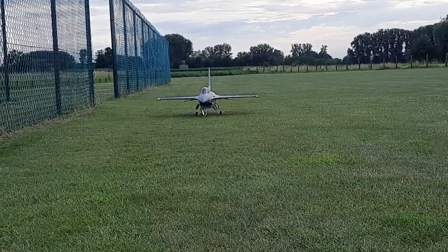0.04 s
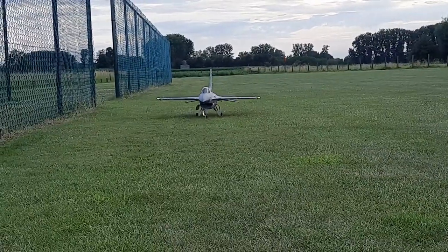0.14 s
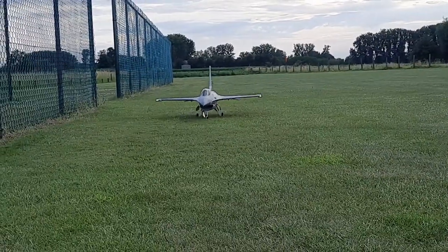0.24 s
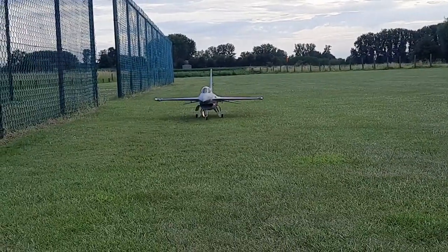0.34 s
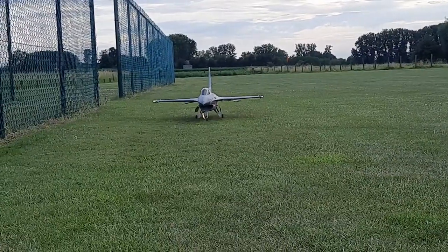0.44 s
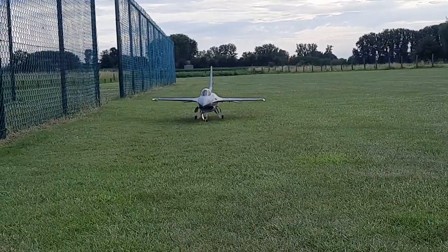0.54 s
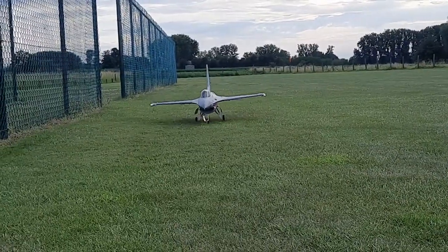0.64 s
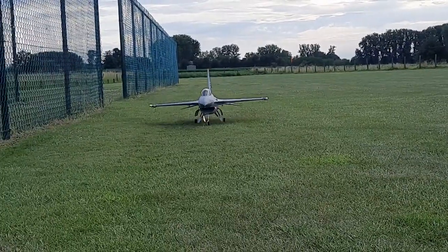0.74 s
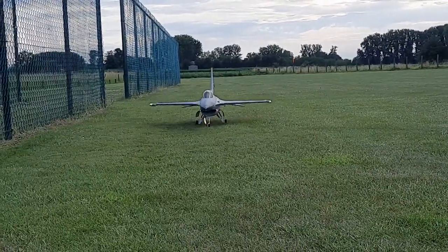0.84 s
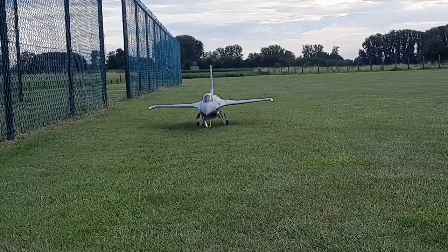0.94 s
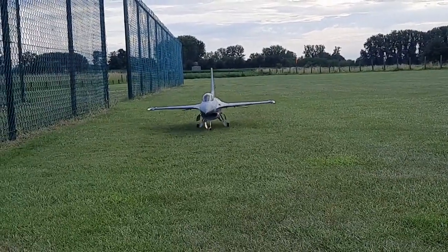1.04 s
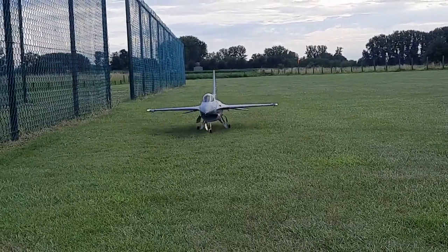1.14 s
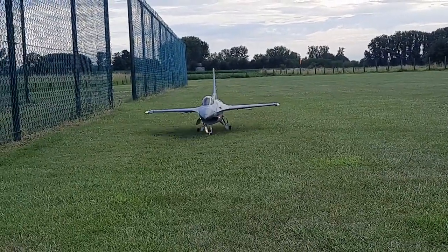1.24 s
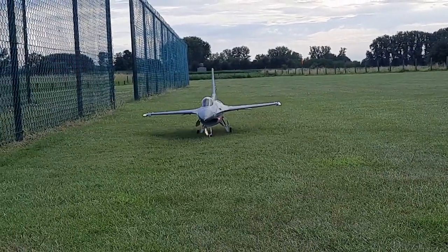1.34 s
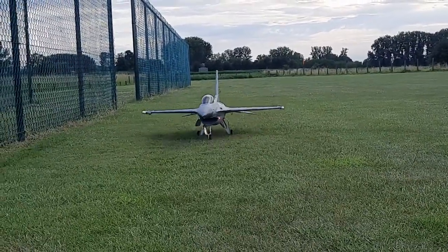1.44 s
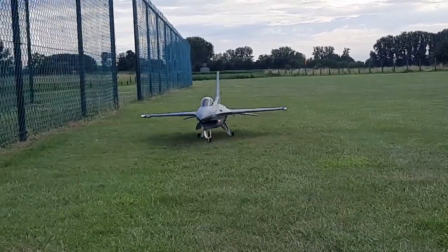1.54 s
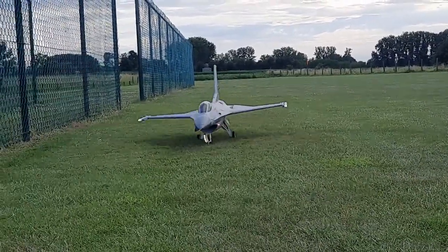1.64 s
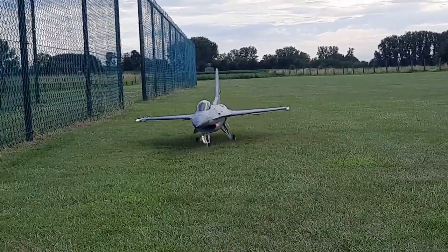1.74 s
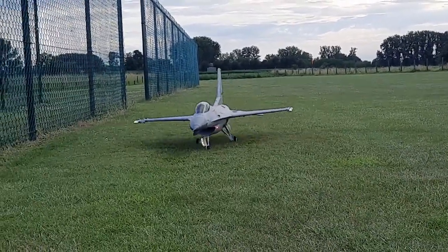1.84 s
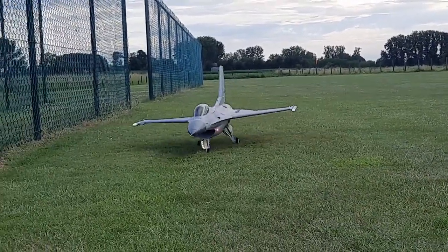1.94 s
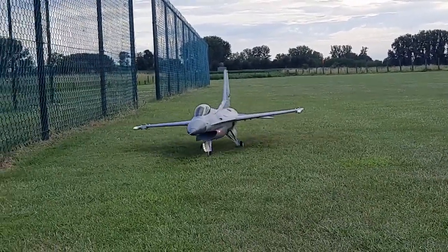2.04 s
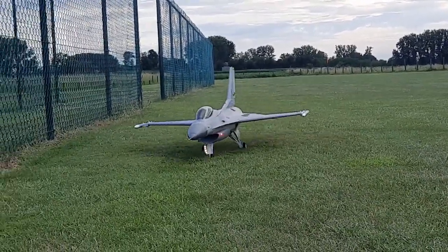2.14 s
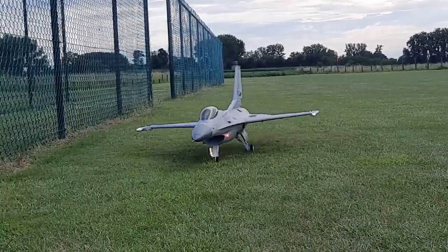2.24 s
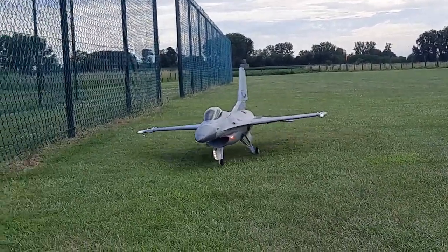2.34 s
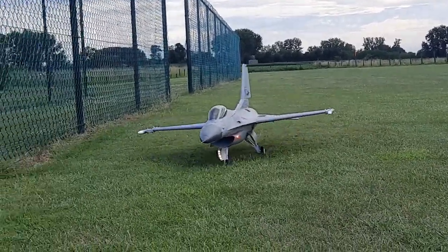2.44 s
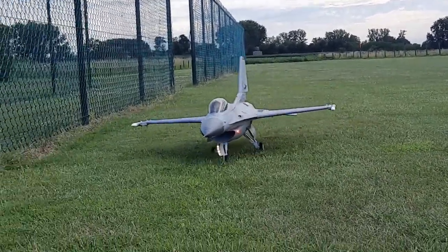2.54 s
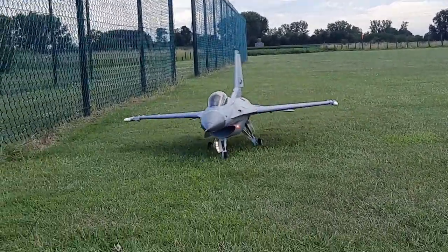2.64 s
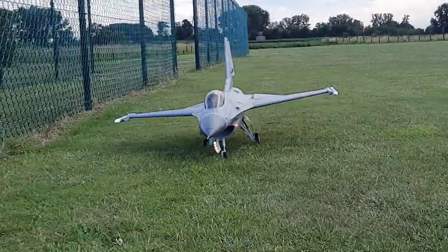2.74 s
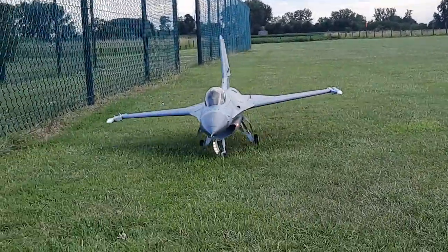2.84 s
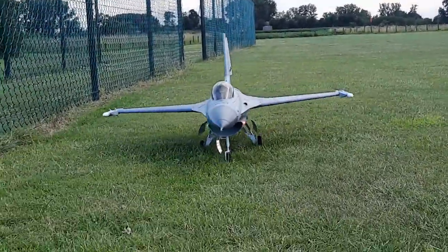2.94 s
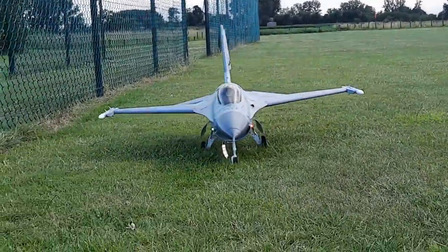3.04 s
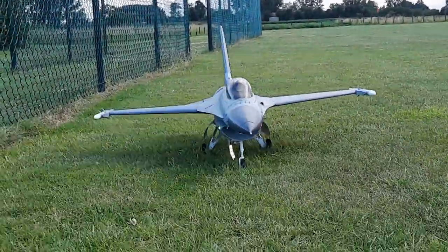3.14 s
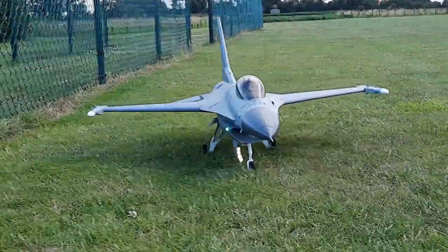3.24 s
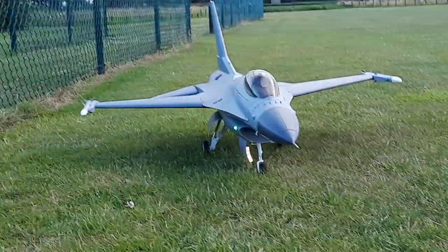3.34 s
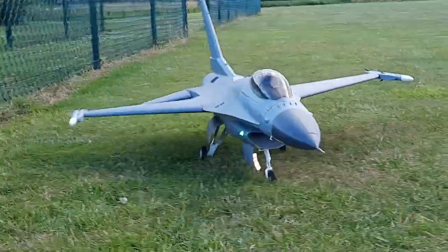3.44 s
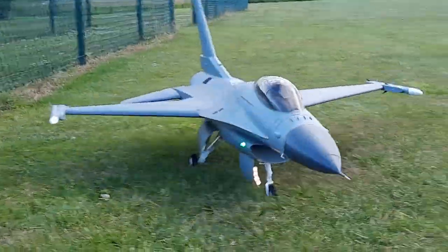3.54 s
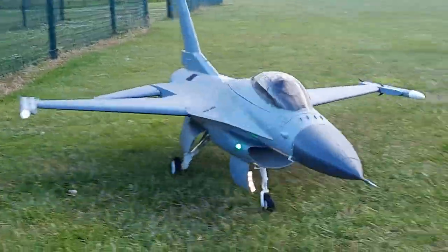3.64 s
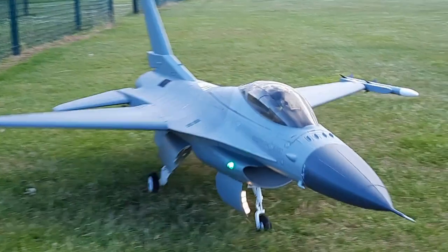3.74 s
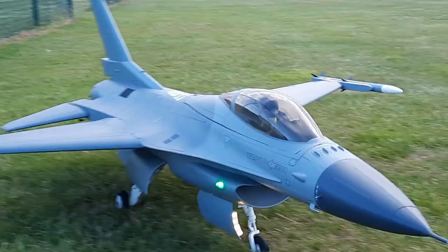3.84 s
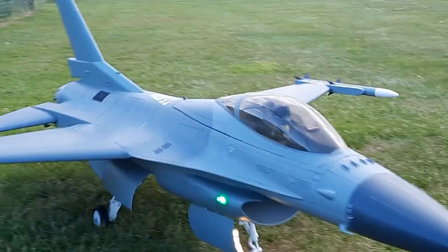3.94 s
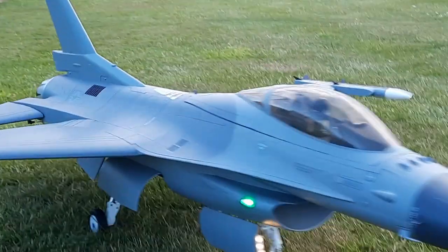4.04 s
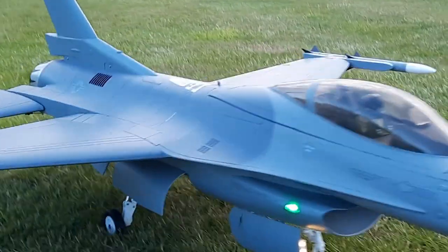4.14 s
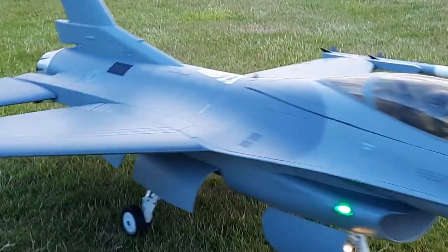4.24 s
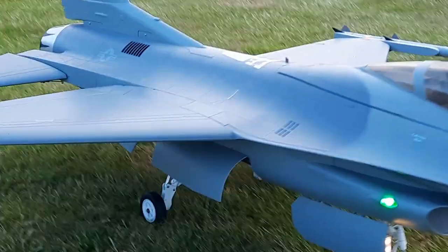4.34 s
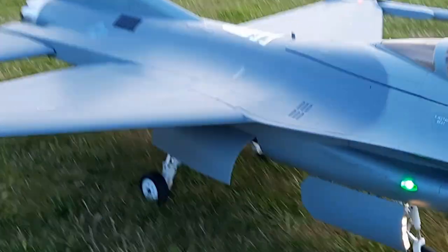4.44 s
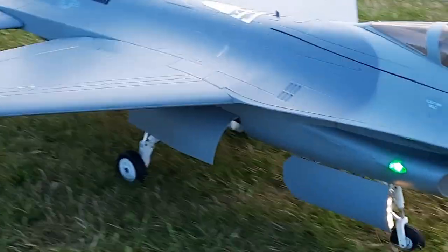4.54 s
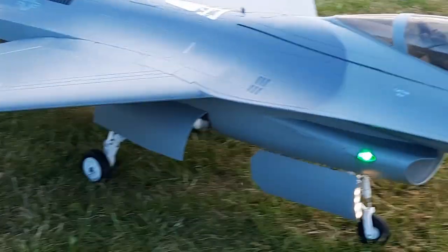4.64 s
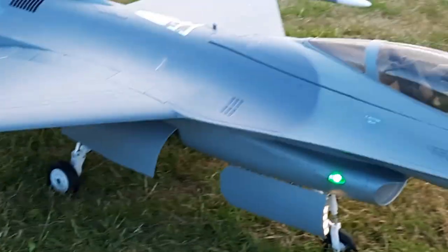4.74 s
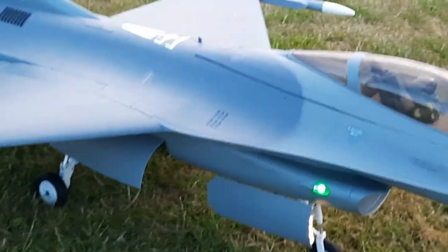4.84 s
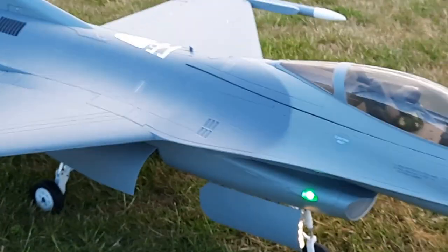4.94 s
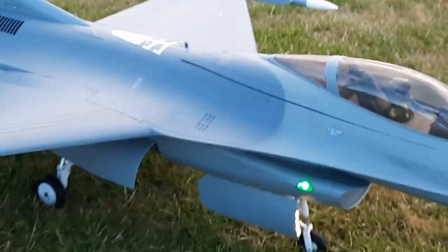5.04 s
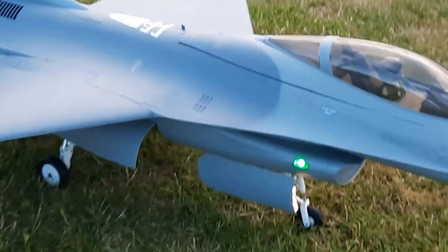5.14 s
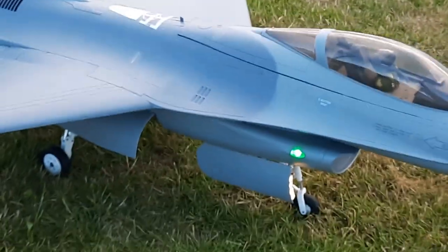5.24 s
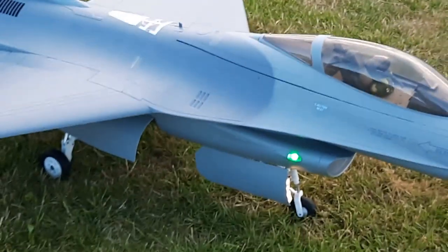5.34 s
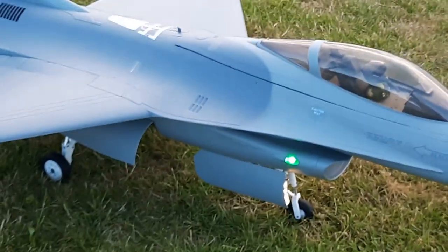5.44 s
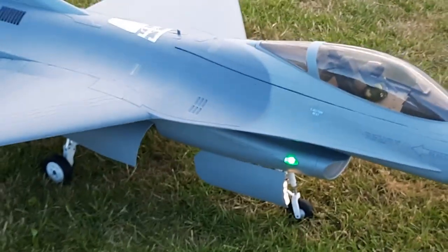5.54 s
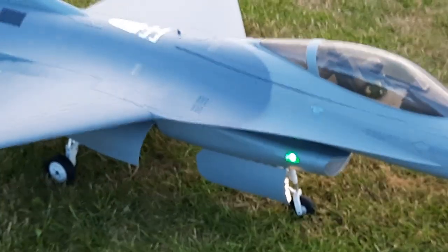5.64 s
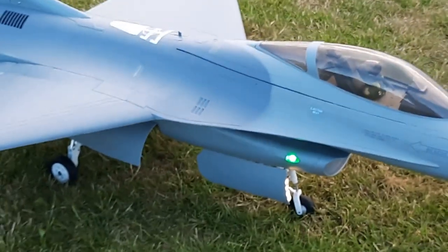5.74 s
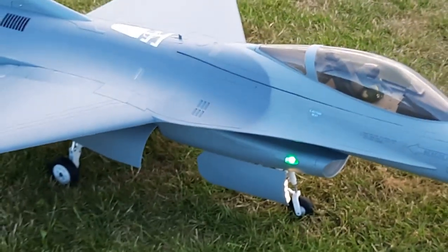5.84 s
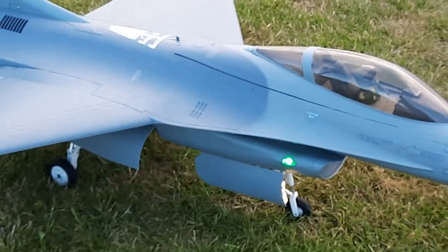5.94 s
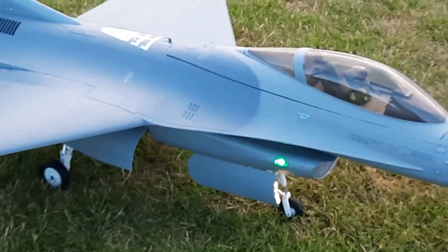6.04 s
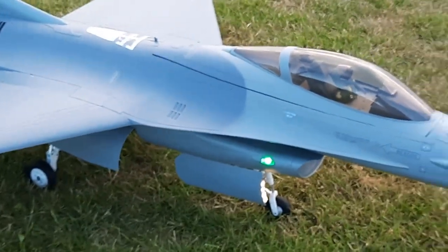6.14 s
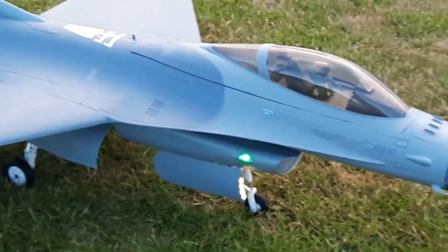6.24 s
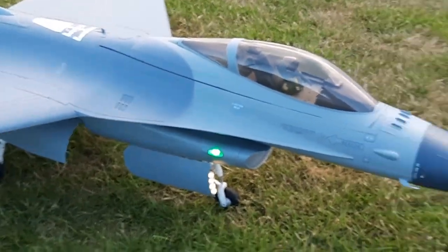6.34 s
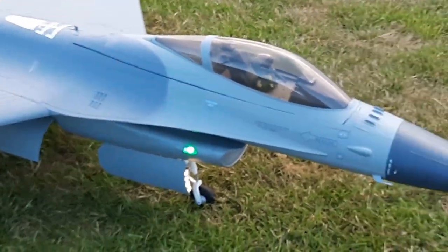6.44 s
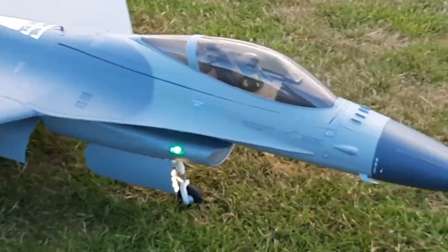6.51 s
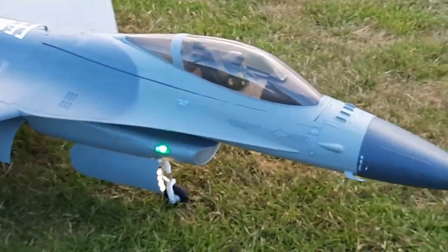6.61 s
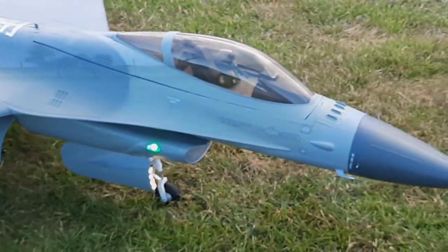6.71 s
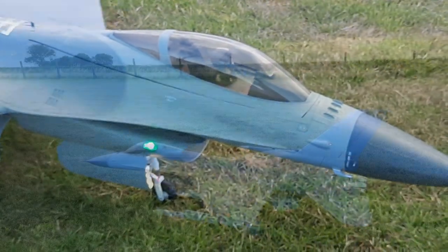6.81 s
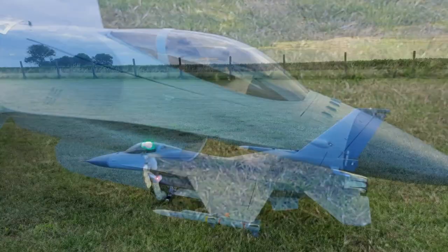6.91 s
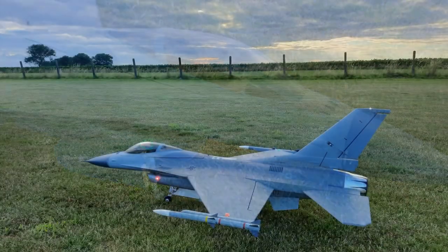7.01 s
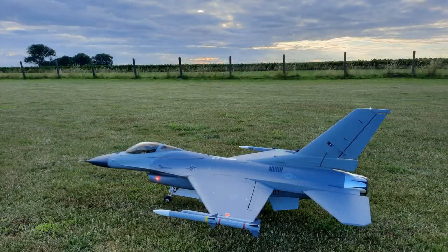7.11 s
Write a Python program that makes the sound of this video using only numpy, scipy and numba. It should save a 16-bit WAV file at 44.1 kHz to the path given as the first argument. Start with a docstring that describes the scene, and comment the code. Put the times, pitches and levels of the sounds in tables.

```python
"""A high whine over rushing air comes closer: a model jet with a twelve-blade electric fan in a duct
taxis over grass towards the microphone. The spinning blades make the whine, the air they push the rush.
The throttle is cut: the whine glides down, grass brushes the wheels, the landing gear knocks in ruts,
and the coasting motor sings through the resonances of its housing.
The jet stands still in a quiet field, then something scuffs close by on the left."""
import sys
import numpy as np
from scipy import signal
from scipy.fft import rfft, irfft
from scipy.io import wavfile
from scipy.ndimage import map_coordinates
from numba import njit

SR = 44100
rng = np.random.default_rng(int(sys.argv[2]) if len(sys.argv) > 2 else 0)


def int16_out(signal):
    """Quantize to a 16-bit WAV file."""
    q = np.round(np.clip(np.atleast_2d(signal).T, -1, 1) * 32767)
    wavfile.write(sys.argv[1], SR, q.astype(np.int16))


N = 316192
T = np.arange(N) / SR   # time of each sample
HZ = np.maximum(np.arange(N // 2 + 1) * SR / N, 1)   # frequency of each point of a spectrum

# how much uneven air entering the fan smears the blade tone: (time [s], level [dB])
INFLOW = [(0, -13.5), (2.2, -9.5), (2.6, -8), (3.2, -10.5), (3.65, -4.5), (3.9, -4), (4.2, -9), (4.5, -19)]


def from_db(db):
    """Turn decibels into a gain."""
    return 10 ** (np.asarray(db) / 20)


def unit_power(x):
    """Scale a signal to an average power of 1."""
    return x / np.sqrt(np.mean(x ** 2) + 1e-20)


def in_time(points):
    """Join (time, value) points into one value per sample."""
    return np.interp(T, *np.transpose(points))


def over_hz(points):
    """Join (frequency, value) points into a curve over the spectrum."""
    hz, values = np.transpose(points)
    return np.interp(np.log(HZ), np.log(hz), values)


def drift(rate_hz):
    """A random wobble of size about 1, mostly slower than rate_hz."""
    return unit_power(irfft(rfft(rng.standard_normal(N)) / (1 + (HZ / rate_hz) ** 2), N))


def held(start_s, length_s, attack_s, release_db_per_s):
    """A gain that rises, holds and dies away."""
    fall_db = np.minimum(release_db_per_s * np.maximum(T - start_s - length_s, 0), 200)
    return np.clip((T - start_s) / attack_s, 0, 1) * from_db(-fall_db)


def noise(spectrum, resonances=(), flicker_db=1.0):
    """Flickering stereo noise of a given colour; left and right differ most in the treble."""
    # how alike the two microphones sound: (frequency [Hz], likeness [0-1])
    likeness = [(60, 0.89), (300, 0.96), (1500, 0.94), (3000, 0.79), (5300, 0.17), (7000, 0.74),
                (10000, 0.15), (15000, 0.15)]
    peaks_db = sum(db / (1 + (2 * (HZ - hz) / width) ** 2) for hz, width, db in resonances)
    band = 1 / np.sqrt((1 + (spectrum[0][0] / HZ) ** 10) * (1 + (HZ / spectrum[-1][0]) ** 20))
    colour = from_db(over_hz(spectrum) + peaks_db) * band
    mid, side = (unit_power(irfft(rfft(white) * colour, N)) for white in rng.standard_normal((2, N)))
    alike = over_hz(likeness)
    side = irfft(rfft(side) * np.sqrt((1 - alike) / (1 + alike)), N)
    return (mid + side * [[1], [-1]]) * from_db(flicker_db * drift(37))


def noisy_tone(phase, width_hz):
    """A narrow band of stereo noise centred on a tone."""
    shared = drift(width_hz) * np.sin(phase) + drift(width_hz) * np.cos(phase)
    return 1.26 * shared + 1.2 * np.array([drift(width_hz), drift(width_hz)]) * np.sin(phase)


def resonate(x, hz, width_hz):
    """Let a signal ring at one pitch; a narrower width rings longer."""
    r = np.exp(-np.pi * width_hz / SR)
    feedback = [1, -2 * r * np.cos(2 * np.pi * hz / SR), r * r]
    return signal.lfilter(np.array([1, 0, -1]) * (1 - r * r) / 2, feedback, x)


def muffle(x, hz):
    """Soften everything above hz."""
    return signal.sosfilt(signal.butter(2, hz, fs=SR, output="sos"), x)


def die_away(hits, decay_s):
    """Give each hit a fading tail."""
    return signal.lfilter([1], [1, -np.exp(-1 / (decay_s * SR))], hits + 1e-18)


def bursts(times, levels_db, decay_s, snap=0):
    """Short gritty contacts; a hard one begins with a snap."""
    hits = np.zeros(N)
    hits[(times * SR).astype(int)] = from_db(levels_db)
    return snap * hits + die_away(hits, decay_s) * rng.standard_normal(N)


def echoes(x):
    """Add weak, slightly late copies that colour the sound."""
    # reflections off the wings and the ground: (delay [s], strength [gain])
    reflections = [(.001083, 0.09), (.00262, .14), (.0071, 0.14)]
    ripple = 1 + sum(strength * np.exp(-2j * np.pi * HZ * delay) for delay, strength in reflections)
    return irfft(rfft(x) * ripple, N)


@njit
def spin(throttle_hz, hz, air_drag, loss_per_s, friction_hz_per_s):
    """Blade passes per second: the motor chases the throttle; drag, losses and friction brake it."""
    blade_hz = np.zeros(len(throttle_hz))
    for i, aim in enumerate(throttle_hz):
        friction = friction_hz_per_s if aim <= 0 else 0.0
        push = air_drag * (aim ** 2 - hz ** 2) + loss_per_s * (aim - hz) - friction
        hz = max(hz + push / SR, 1.0)
        blade_hz[i] = hz
    return blade_hz


def fan_whine(phase, load, flutter_db=2.5, smear=0.48):
    """The passing blades make a fluttering tone, with overtones while the motor drives them."""
    # the tone swells and fades as the jet rolls and turns: (time [s], level [dB])
    swells = [(0, -43), (.65, -43), (.78, -35), (.88, -47), (1.04, -35.5), (1.25, -45), (1.47, -35),
              (1.63, -45.5), (1.77, -37), (1.97, -49), (2.1, -40), (2.36, -50), (2.48, -32), (2.65, -37),
              (3.06, -34.5), (3.25, -36), (3.42, -50), (3.65, -44.5), (3.8, -26), (3.94, -39.5),
              (4.0, -36.5), (4.12, -52), (4.21, -51), (4.3, -67), (4.7, -100)]
    # the tone and its overtones: (multiple of the blade rate, level [dB])
    harmonics = [(1, 1.5), (2, -12.5), (3, -20.5)]
    whine = np.zeros((2, N))
    unsteady = smear * from_db(in_time(INFLOW))
    for multiple, db in harmonics:
        gain = from_db(db + flutter_db * drift(23)) * (load if multiple > 1 else 1)
        for side in whine:
            side += gain * from_db(drift(16)) * np.sin(multiple * phase + unsteady * drift(60))
    return np.sqrt(2) * from_db(in_time(swells)) * whine


def flow_gain(blade_hz, db, distance_db, speed_db, near_m=2.3, full_hz=4478):
    """Air noise loses distance_db when the jet is twice as far, and speed_db at half the fan speed."""
    # how far the jet is from the microphone: (time [s], distance [m])
    distance = [(0, 8.96), (1.2, 6.66), (2.05, 4.65), (2.5, 3.94), (3.0, 3.1), (3.6, 2.38), (4.3, 3.2)]
    doublings = np.log2(in_time(distance) / near_m)
    return from_db(db - distance_db * doublings + speed_db * np.log2(blade_hz / full_hz))


def fan_roar(blade_hz, phase, blades=12):
    """The jet of air roars through the duct; at first the unbalanced shaft hums too."""
    # colour of the roar: (frequency [Hz], level [dB])
    colour = [(60, -30.5), (150, -9), (230, -15.5), (280, 0), (345, -1.5), (480, -1.5), (570, -7.5),
              (680, -3), (810, -8), (910, -2), (1040, -5.5), (1150, -11), (1350, -16)]
    # resonances of the duct: (frequency [Hz], width [Hz], level [dB])
    duct = [(346, 36, 2), (423, 190, 4), (1050.5, 61, 6.5)]
    # the same close by, shifted by the ground reflection: (frequency [Hz], width [Hz], level [dB])
    duct_near = [(287, 110, -3), (450, 160, 4), (1044, 61, 5.5)]
    hum = from_db(-11 + 3.6 * drift(6.2)) * np.sin(phase / blades) * np.interp(T, [2.2, 3.0], [1, 0])
    near = np.interp(T, [2.3, 3.2], [0, 1])
    roar = np.sqrt(1 - near) * noise(colour, duct) + np.sqrt(near) * noise(colour, duct_near)
    return flow_gain(blade_hz, -27, distance_db=5.49, speed_db=10) * (roar + hum)


def fan_rush(blade_hz):
    """Swirling air rushes in the middle range."""
    # colour of the rush: (frequency [Hz], level [dB])
    colour = [(1100, -19), (1330, -9), (1500, -1), (1800, -9.5), (2100, -8), (2350, -2), (2600, -4),
              (2900, -2), (3250, -11.5), (4000, -21)]
    return flow_gain(blade_hz, -31, distance_db=9.4, speed_db=7.3) * noise(colour)


def fan_hiss(blade_hz, phase, load):
    """Air hisses in the intake; the blades chop its swirls, smearing part of their tone into noise."""
    # colour of the hiss: (frequency [Hz], level [dB])
    colour = [(2600, -13.5), (3200, 1), (3700, -3.5), (4400, -1), (5200, -2), (5900, -3.5), (6500, -2),
              (7500, -1), (8300, -3.5), (9100, -15), (11500, -14.5), (13300, -12), (14500, -19.5),
              (17000, -20)]
    # resonances across the intake: (frequency [Hz], width [Hz], level [dB])
    intake = [(5540, 240, 2.3), (6500, 430, 2)]
    coasting = np.interp(T, [3.85, 3.97], [0, 1])
    chopped = noisy_tone(phase, width_hz=480)
    chopped += load * from_db(-10) * noisy_tone(3 * phase, width_hz=220)
    chopped += coasting * from_db(1) * noisy_tone(2 * phase, width_hz=300)
    hiss = noise(colour, intake, flicker_db=0.58) + from_db(in_time(INFLOW)) * chopped
    return flow_gain(blade_hz, -26, distance_db=4.7, speed_db=13.3) * hiss


def intake_whistle(hz=5560, width_hz=30):
    """One resonance of the intake sings at a steady pitch, briefly loud as the throttle opens."""
    # loudness of the whistle: (time [s], level [dB])
    loudness = [(0, -68), (2.2, -51), (2.3, -43), (2.48, -38.5), (2.55, -51.5), (4.0, -70), (4.4, -130)]
    return from_db(in_time(loudness)) * noisy_tone(2 * np.pi * hz * T, width_hz)


def wheel_rumble():
    """The wheels rumble as they roll on turf."""
    # loudness of the rolling: (time [s], level [dB])
    loudness = [(0, -58.5), (2.0, -69), (2.6, -50), (3.7, -44.5), (4.0, -50.5), (4.3, -61), (5.0, -64),
                (5.2, -86.5)]
    # colour of the rumble: (frequency [Hz], level [dB])
    colour = [(40, -24.5), (85, -4), (220, -2.5)]
    return from_db(in_time(loudness)) * noise(colour, flicker_db=2.5)


def background():
    """A faint, low noise lies behind everything."""
    # loudness of the faint background noise, which swells briefly at the very end: (time [s], level [dB])
    loudness = [(0, -67), (5.3, -71), (6.65, -73), (6.8, -75), (7.05, -74), (7.17, -65)]
    # its colour: (frequency [Hz], level [dB])
    colour = [(25, -20), (50, -6.5), (134, -4), (210, -14), (310, -6.5), (500, -13), (740, -18), (890, -19),
              (1500, -26), (2200, -11), (3100, -30), (5700, -28), (9300, -34), (16000, -32)]
    return from_db(in_time(loudness)) * noise(colour)


def grass(snaps_per_s=500, stop_s=5.02):
    """Stalks snap at random in tiny bright ticks, and grass brushes the gear until the jet stops."""
    # crackling under the slowing wheels: (time [s], level [dB])
    crunch = [(3.6, -110), (4.0, -49), (4.5, -59.5), (4.95, -67), (5.1, -110)]
    # colour of the snapping stalks: (frequency [Hz], level [dB])
    stalk_colour = [(1500, -13), (5000, 7.5), (8000, -9), (16000, -12.5)]
    # brushing on the wheels and gear doors: (time [s], level [dB])
    brushing = [(3.9, -72), (4.2, -49), (4.36, -62), (4.47, -51), (4.56, -47), (4.66, -54.5), (4.7, -47),
                (4.78, -49.5), (4.815, -45), (4.87, -52), (4.91, -47.5), (4.935, -47), (5.02, -51.5)]
    # colour of the brushing: (frequency [Hz], level [dB])
    brush_colour = [(110, -10.5), (330, -3), (900, -5), (1200, -9), (1600, -11), (2900, -4), (3500, -8),
                    (6500, -16.5), (9500, -26), (16000, -30)]
    snaps = (rng.random(N) < snaps_per_s / SR) * rng.exponential(1, N)
    crackle = from_db(in_time(crunch)) * unit_power(die_away(snaps, decay_s=.0008)) * noise(stalk_colour)
    brush = from_db(in_time(brushing)) * noise(brush_colour, flicker_db=2.5)
    return crackle + brush * held(0, stop_s, attack_s=.01, release_db_per_s=170)


def gear_knocks():
    """The wheels drop into ruts: a sharp clack and a slower, low thump ring the hollow body."""
    # landing gear knocks: (time [s], clack level [dB], thump level [dB])
    knocks = [(4.0662, -26, -26), (4.112, -24.5, -35), (4.203, -31, -29), (4.2263, -24, -29.5),
              (4.268, -35, -47.5), (4.311, -37, -50), (4.388, -27, -35.5), (4.413, -29, -45),
              (4.4217, -37, -38), (4.477, -31, -48), (4.5175, -26.5, -49), (4.5278, -29, -55),
              (4.585, -28, -38), (4.5916, -27, -65), (4.611, -31, -42), (4.7213, -33, -44),
              (4.734, -45, -38), (4.832, -28.5, -51)]
    # resonances of the jet's body: (frequency [Hz], width [Hz], level [dB])
    airframe = [(150, 70, -30), (305, 18, 1.5), (424, 90, 1), (517, 140, 0), (850, 82, -3),
                (1040, 150, -27.5), (1670, 340, -3), (2300, 200, -0.5), (2690, 760, -1),
                (5200, 2900, -13.5)]
    times, clack_db, thump_db = np.transpose(knocks)
    clack = bursts(times, clack_db + 9.5, decay_s=.0031, snap=5.4)
    thump = bursts(times, thump_db + 13, decay_s=.023)
    body = sum((-1) ** k * from_db(db) * resonate(clack, hz, width)
               for k, (hz, width, db) in enumerate(airframe))
    low = resonate(thump, 345, 160) + from_db(-6) * resonate(thump, 153, 94)
    return muffle(body, 6000) + muffle(low, 1100)   # rubber tyres dull the clack


def motor_song(blade_hz, phase, smooth_above_hz=1800, stall_below_hz=109):
    """Magnets tug on the coasting motor; each tone swells as it slides through a housing resonance."""
    # tones of the magnetic tugging: (multiple of the blade rate)
    multiples = [1 / 3, 1, 2, 3]
    # resonances of the fan housing, one list per tone: (frequency [Hz], width [Hz], level [dB])
    housing = [
        [(95, 20, -27), (290, 76, -21.5)],
        [(228, 28, -19), (267, 14, 0.5), (289, 40, 1), (423, 56, -5.5), (494, 54, -5.5), (562, 29, 0.5),
         (605, 210, -7.5), (833, 29, -5), (1115, 180, -16), (1470, 100, -2)],
        [(291, 45, -14.5), (546, 100, -15.5), (884, 160, -23.5), (1640, 100, -14.5)],
        [(980, 130, -17)],
    ]
    song = 0
    for multiple, resonances in zip(multiples, housing):
        power = sum((from_db(db) / (1 + (2 * (multiple * blade_hz - hz) / width) ** 2) ** 1.15) ** 2
                    for hz, width, db in resonances)
        gain = np.sqrt(power / (1 + (stall_below_hz / blade_hz) ** 20))
        song += from_db(drift(25)) * gain * np.sin(multiple * phase)
    return np.sqrt(2) * from_db(-32.5) / (1 + (blade_hz / smooth_above_hz) ** 3) * song


def scuffs(attack_s=.011, grain_db=2.5):
    """Dry, grainy rubbing strokes, each with a brief ring; a light contact lasts through them all."""
    # strokes: (start [s], length [s], level [dB], ring frequency [Hz], ring level [dB])
    strokes = [(6.167, 0.034, -49, 980, -62), (6.255, 0.046, -40, 1920, -47),
               (6.285, 0.029, -38, 830, -43.5), (6.365, 0.074, -44, 2980, -46),
               (6.478, 0.049, -44.5, 3200, -53), (6.489, 0.016, -50, 3300, -36),
               (6.518, 0.013, -36.5, 3230, -33.5)]
    # colour of the rubbing: (frequency [Hz], level [dB])
    colour = [(180, -52), (300, -21), (418, -38.5), (574, -33), (814, -11), (961, -11), (1410, -7.5),
              (1640, -18), (1870, 0), (2140, -2), (3190, -1.5), (6000, -13), (9090, -26), (11100, -19.5),
              (16000, -27)]
    # peaks and dips in that colour: (frequency [Hz], width [Hz], level [dB])
    resonances = [(320, 60, 9.5), (555, 140, -10), (1910, 100, 0), (2120, 500, -9), (9000, 450, 4),
                  (11900, 370, 3)]
    contact = from_db(-53) * held(6.171, .35, attack_s, release_db_per_s=219)
    power, rings = contact ** 2, 0
    for start, length, db, hz, ring_db in strokes:
        stroke = held(start, length, attack_s, release_db_per_s=624)
        power += (from_db(db) * stroke) ** 2
        ring = resonate(rng.standard_normal(N), hz, 55 + hz / 20)
        rings += from_db(ring_db) * stroke * unit_power(resonate(ring, hz, hz / 5))
    rub = np.sqrt(power) * from_db(grain_db * drift(230)) * echoes(noise(colour, resonances))
    return rub + rings


def grass_ticks(hz=750):
    """Two small, dull ticks sound in the grass."""
    # ticks: (time [s], level [dB])
    ticks = [(6.864, -60.5), (6.928, -51.5)]
    times, db = np.transpose(ticks)
    clicks = bursts(times, db + 5, decay_s=.005)
    return resonate(resonate(clicks, hz, 700), hz, 900)


def microphones(x):
    """Sound from the left reaches the left microphone first; the right one barely hears the top octave."""
    # direction of the sound: (time [s], head start of the left microphone [samples])
    lead = [(0, 0.94), (2.9, 0.046), (3.75, 2.64), (4.75, 6.4), (6.2, 5.4)]
    # balance of the two microphones: (frequency [Hz], left minus right [dB])
    balance = [(100, 2.13), (900, 4.52), (2000, 0.93), (3100, -3.5), (3900, 3.93), (4900, -1), (8400, -.5),
               (9400, 5.74), (10100, 20.83), (11700, 11.93), (15500, 13.76)]
    late_right = map_coordinates(x[1], [np.arange(N) - in_time(lead)], order=3, mode="nearest")
    ratio = from_db(over_hz(balance))
    gains = np.array([ratio, np.ones_like(ratio)]) * 2 / (1 + ratio)
    return irfft(rfft(np.array([x[0], late_right])) * gains, N)


def scene():
    """One fan speed drives the whine, the air noise and the motor's song; faint noise lies behind."""
    # throttle (taxi, a little more, then cut): (time [s], blade rate it aims for [Hz])
    throttle = [(0, 4090), (.12, 4157), (2.3, 4157), (2.36, 4310), (2.6, 4400), (2.76, 4490), (3.69, 4478),
                (3.76, 3884), (3.9, 2838), (3.989, 0)]
    blade_hz = spin(in_time(throttle), hz=4260.0, air_drag=.000938, loss_per_s=.709,
                    friction_hz_per_s=461.5)
    blade_hz *= 1 + .0004 * drift(9)
    phase = 2 * np.pi * np.cumsum(blade_hz) / SR
    load = np.interp(T, [3.72, 3.85], [1, 0])   # the blades work hard until the throttle is cut
    jet = fan_whine(phase, load) + fan_roar(blade_hz, phase)
    jet += echoes(fan_rush(blade_hz) + fan_hiss(blade_hz, phase, load))
    jet += motor_song(blade_hz, phase) + gear_knocks() + wheel_rumble() + grass() + intake_whistle()
    return background() + microphones(jet + scuffs() + grass_ticks())


def record(dry, cutoff_hz=15800):
    """Cut the highest treble steeply."""
    return irfft(rfft(dry) / np.sqrt(1 + (HZ / cutoff_hz) ** 800), N)


dry = scene()
out = record(dry)
int16_out(out)
```